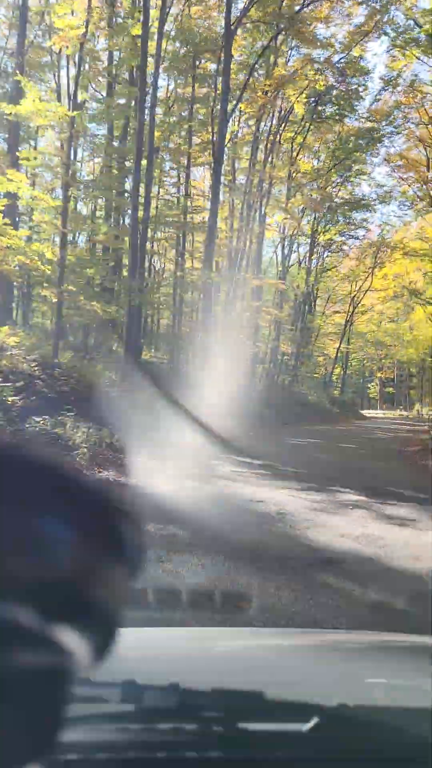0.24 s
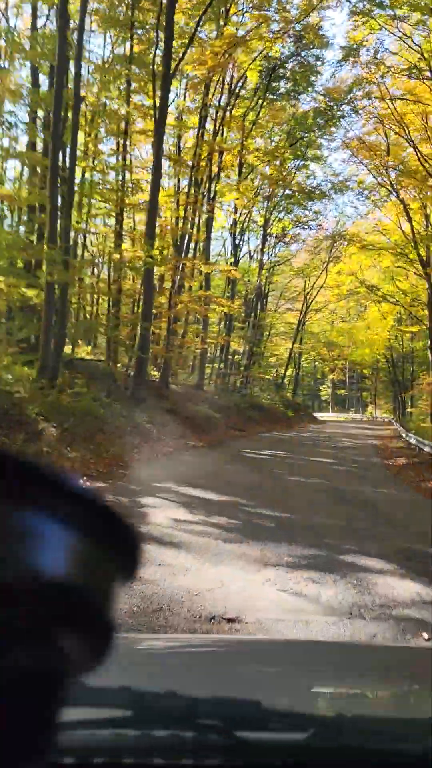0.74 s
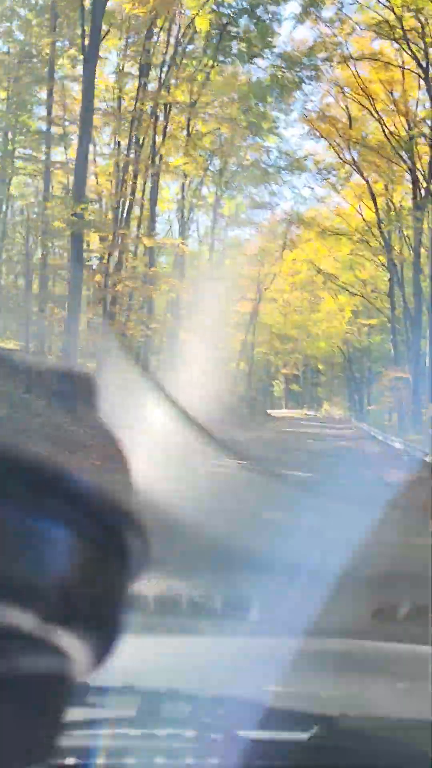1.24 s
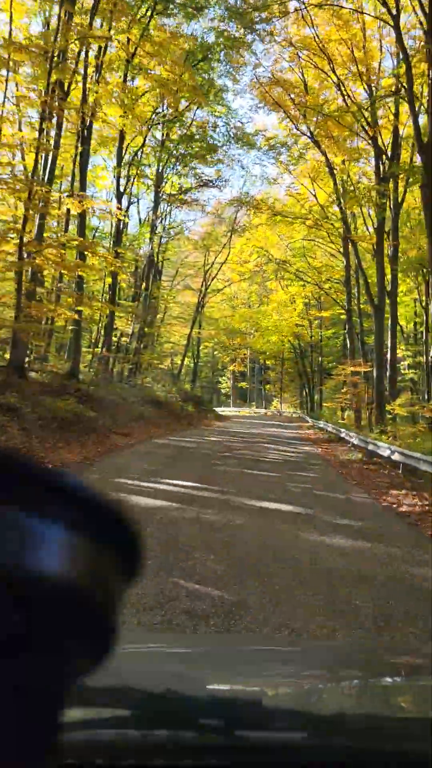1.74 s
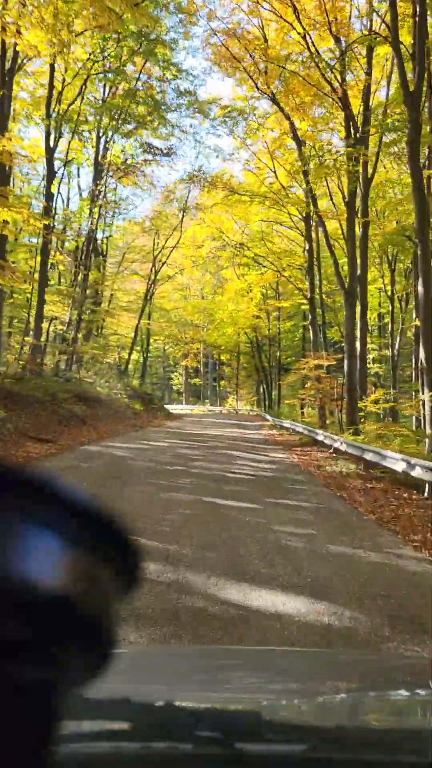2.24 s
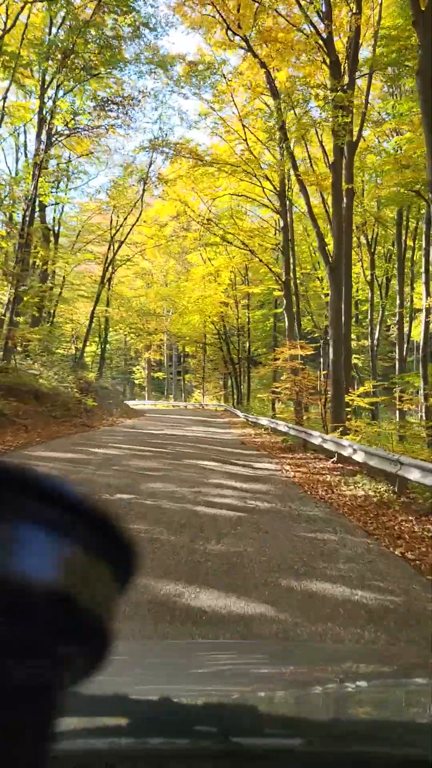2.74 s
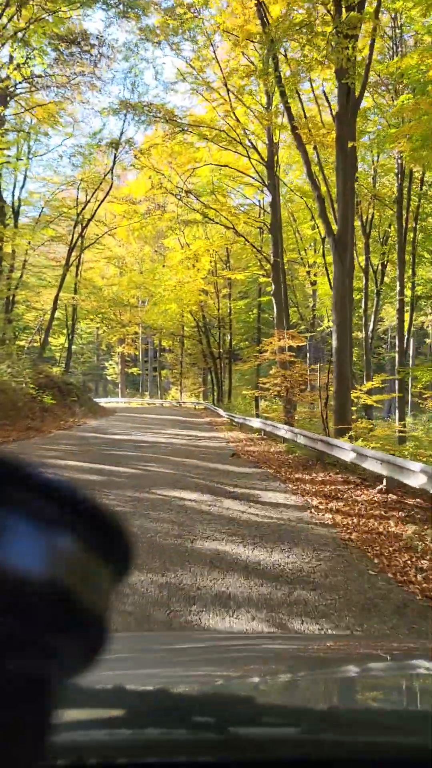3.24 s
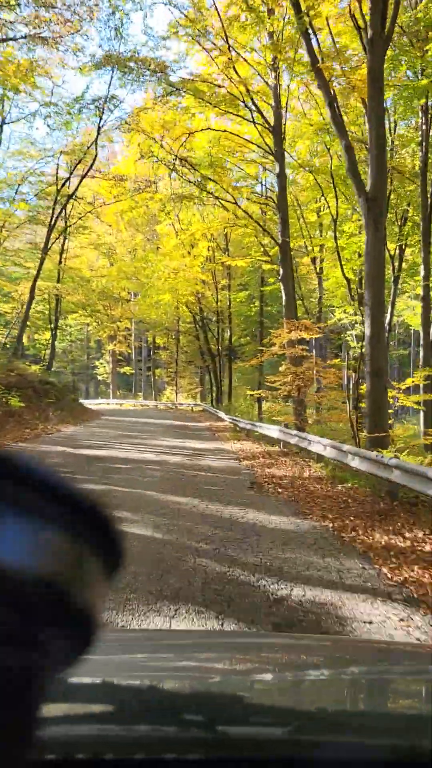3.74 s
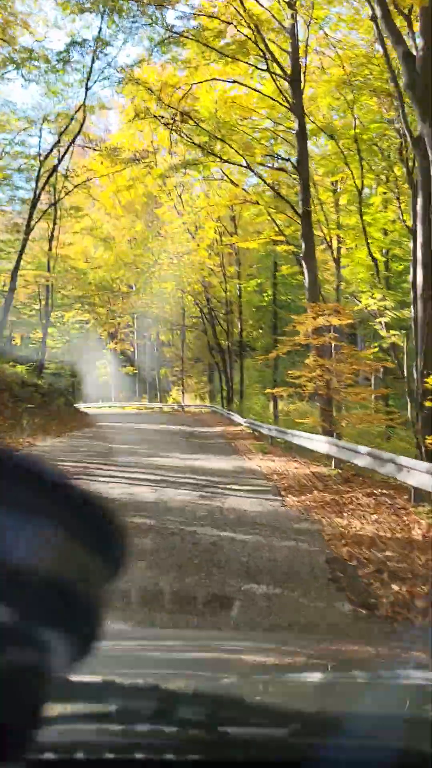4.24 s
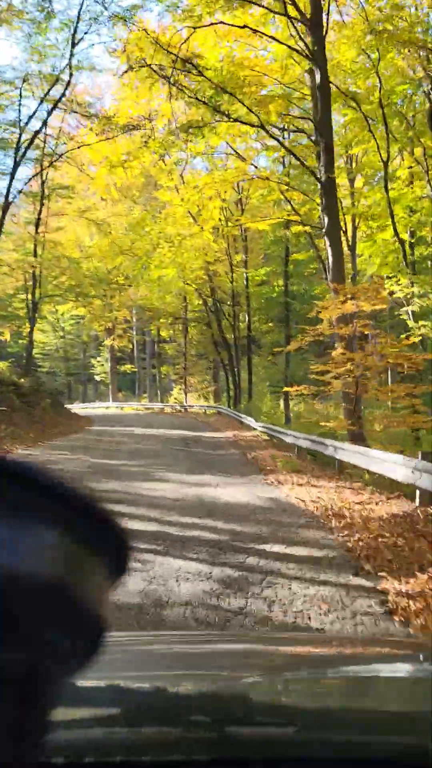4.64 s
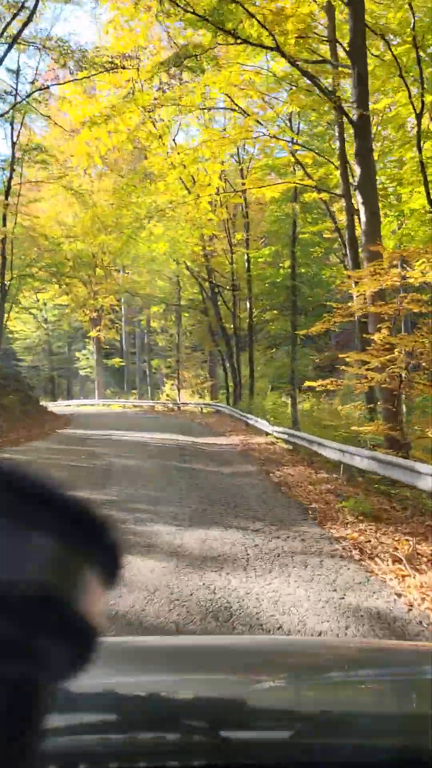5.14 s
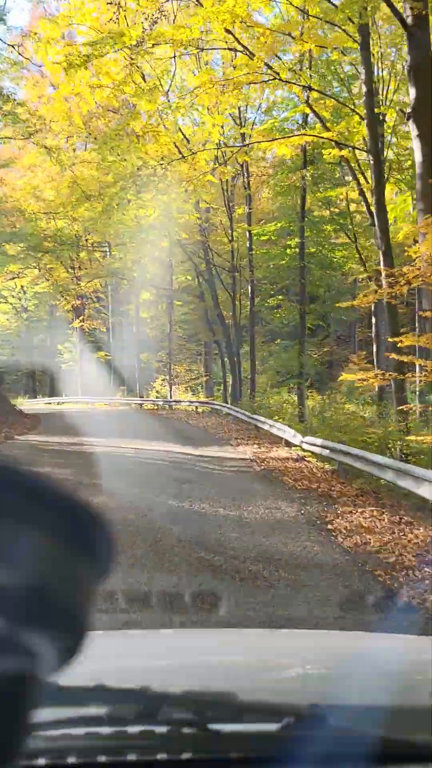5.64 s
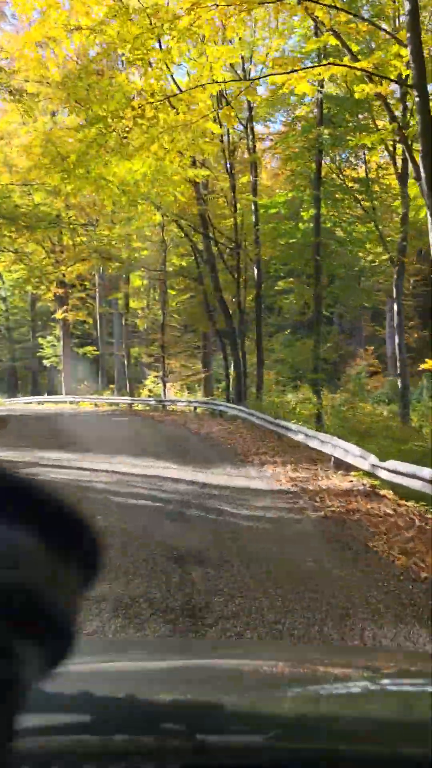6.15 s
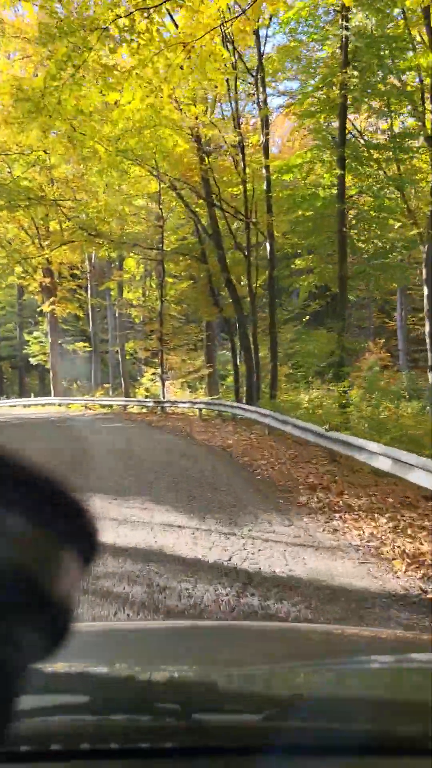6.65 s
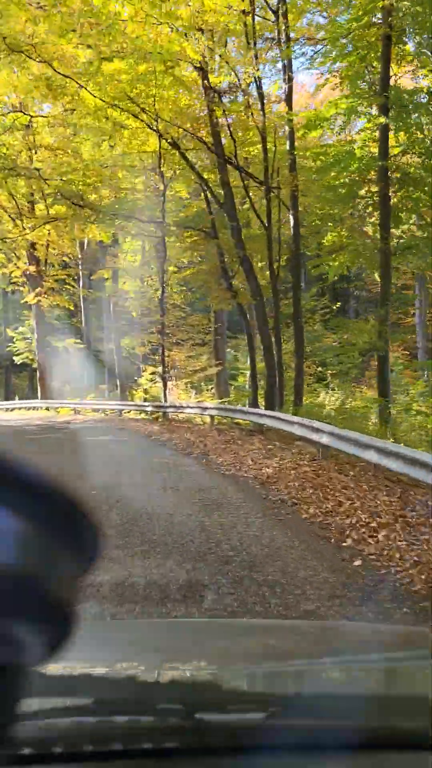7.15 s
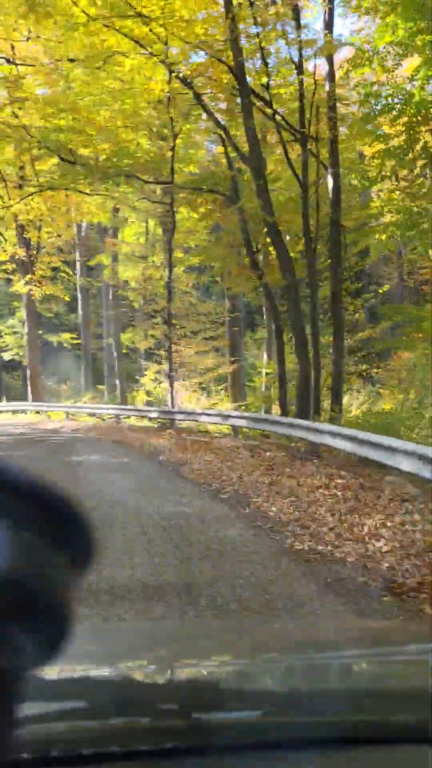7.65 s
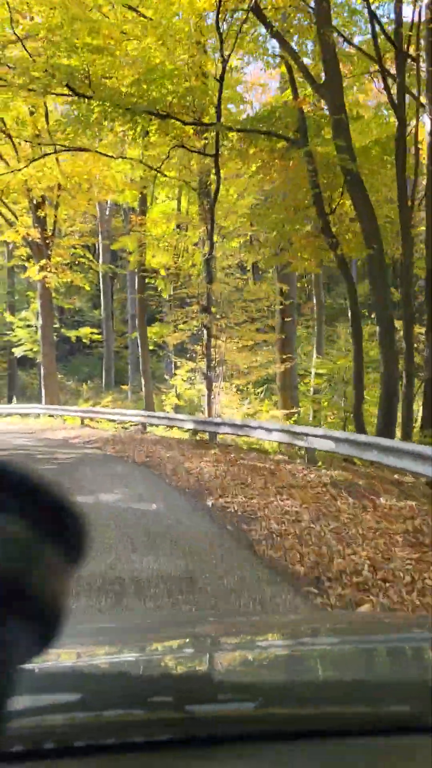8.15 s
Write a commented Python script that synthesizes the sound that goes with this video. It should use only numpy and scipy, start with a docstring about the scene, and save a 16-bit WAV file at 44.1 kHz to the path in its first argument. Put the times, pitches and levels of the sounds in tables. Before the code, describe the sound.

The enclosed cabin of a car driving on rough forest asphalt, heard in stereo near the windscreen. Throughout, a very deep body boom and low floor thrum waver and swell over bumps, beneath a muffled, uneven tyre hum and roar. A quiet fluttering trim hiss, tiny crackles and bright ticks of a loose plastic dash part sit on top, the ticks leaning slightly right. From 0 to 1.6 s the road is bumpy, with dry knocks clustered at 0.7-1.3 s, strongest near 0.95. From about 1.8 to 3.5 s it smooths and quietens, with only sparse ticks. Roughness returns at 3.6 s; the hardest jolt, a sharp crack with heavy boom, comes at 4.2 s, and a smaller one at 4.44. It calms from 4.7 to 5.8 s. Knocks near 6 s begin another rough stretch, with frequent rattling and lesser knocks at 7.3, 7.7 and 8 s, easing slightly by 8.4.

```python
"""Car cabin on a rough forest road

A two-port microphone behind the windscreen hears the body boom and the floor thrum at every bump,
above an uneven tyre hum and a roar that follows the road. Trim hisses and crackles, a loose plastic
part on the dash ticks, and harder bumps knock the trim. All sources are shaped noise: resonances or
drawn colours set the timbre, the unevenness and coarseness of the road drive the continuous layers,
and ticks, snaps and knocks are short puffs."""
import sys
import numpy as np
from scipy import signal
from scipy.fft import irfft
from scipy.io import wavfile
from scipy.ndimage import uniform_filter1d

SR = 44100
rng = np.random.default_rng(int(sys.argv[2]) if len(sys.argv) > 2 else 0)


def gain_from_decibels(decibels):
    """Convert decibel values to linear amplitude factors."""
    exponent = np.asarray(decibels, float) / 20
    return 10 ** exponent


def master(y):
    """Save y as 16-bit WAV."""
    cut = np.clip(np.atleast_2d(y).T, -1, 1)
    pcm = np.round(cut * 32767)  # scale
    wavfile.write(sys.argv[1], SR, pcm.astype(np.int16))


N = 370440

# a wheel meets a bump: crest_s, boom_db, thrum_db,
# grit_change_db (added to the coarseness: mostly a crunch, at a few bumps a slight lull)
BUMPS = [(0.09, -26, -23, 5), (0.36, -20.5, -22, 4.5), (0.479, -13, -19, 3.5), (0.61, -12.5, -19.5, -1.5),
         (0.739, -28.5, -21, 2.5), (0.92, -15, -18.5, 9.5), (0.979, -11.5, -23, -0.5),
         (1.131, -9.5, -20.5, 3.5), (1.2, -10.5, -17.5, 0.5), (1.57, -16, -21, 1.5), (3.699, -16, -23.5, 2),
         (3.79, -27, -16.5, -3.1), (3.909, -19.5, -19.5, 2), (4.19, -6, -10.5, 8.5),
         (4.24, -21.5, -24, 6.5), (4.36, -16, -21.5, 1.5), (4.449, -9, -13, 3.5), (4.5, -12.5, -33.5, 5),
         (4.721, -15, -30, 2.5), (5.26, -21.5, -32, 1.5), (5.39, -14, -32.5, 4), (6.0, -12, -25.5, 4),
         (6.17, -29, -24, 3.5), (6.258, -10.5, -21, 5), (6.7, -17.5, -23, 2.5), (7.1, -16.5, -18.5, 1.5),
         (7.259, -18, -21.5, 1), (7.528, -16, -21, 2), (7.68, -12.5, -17, 2.5), (8.04, -13.5, -15, 4),
         (8.16, -18, -17, 4.5)]


def evened(x):
    """Scales to rms 1."""
    return x / np.sqrt(np.mean(x ** 2) + 1e-20)


def read(points, hz):
    """Reads a table on a log-frequency axis."""
    f, value = np.transpose(points)
    return np.interp(np.log(hz + 1), np.log(f + 1), value)


def filled(coarse):
    """Spreads values given every 64 samples over all samples in straight lines."""
    return np.interp(np.arange(N), np.arange(0, N, 64), coarse)


def flutter(s):
    """Smooth chance of rms 1 that changes over about s seconds."""
    width = int(s * SR)
    return evened(uniform_filter1d(uniform_filter1d(rng.standard_normal(N), width), width))


def shaking(axis):
    """One column of the road in dB for every sample: 1 unevenness, 2 coarseness."""
    # the road under the wheels: time_s, unevenness_db, coarseness_db
    road = [(0.0, 2, -3.5), (0.3, 5.5, 0.5), (0.8, 2.5, 2), (1.2, 0.5, 3), (1.62, 3.5, 2.5), (1.8, 1, -4.5),
            (2.3, -1.5, -5.5), (2.95, -3, -3.5), (3.601, 5.5, 3.5), (4.05, 3, 2.5), (4.4, 3, 3.5),
            (4.721, -0.5, -5.5), (5.201, -0.5, -3.5), (5.621, 0, -5), (5.9, 4, 2.5), (6.501, 4.5, 0.5),
            (7.1, 4.5, 2.5), (7.6, 4.5, 4), (7.9, 2, 0.5), (8.4, 1, -2)]
    return np.interp(np.arange(N) / SR, [row[0] for row in road], [row[axis] for row in road])


def grit_db():
    """Coarseness of the asphalt, changed for a moment at a bump: mostly a crunch, at a few a lull."""
    change_s = 0.044
    t = np.arange(0, N, 64) / SR
    change_db = sum(db * np.exp(-((t - s) / change_s) ** 2) for s, _, _, db in BUMPS)
    return shaking(axis=2) + filled(change_db)


def jolted(steady_db, axis):
    """Gain with the swell of every bump added in power: a quick climb to the crest, a slower fall."""
    rise_db_per_s, fall_db_per_s = 260.5, 199
    t = np.arange(0, N, 64) / SR
    power = 0
    for row in BUMPS:
        late = t - row[0]
        below_crest_db = np.maximum(-rise_db_per_s * late, fall_db_per_s * late)
        power = power + gain_from_decibels(row[axis] - below_crest_db) ** 2
    return np.sqrt(gain_from_decibels(steady_db) ** 2 + filled(power))


def modes_db(modes, hz, order=1):
    """Summed power of resonances as dB over frequency; a higher order steepens their skirts."""
    power = sum(gain_from_decibels(db) ** 2 / (1 + (2 * (hz - f) / w) ** 2) ** order for f, w, db in modes)
    return 10 * np.log10(power)


def ports(colour_db, size=N):
    """Coloured noise of rms 1 at both ports: partly alike, the left phase-shifted and rebalanced."""
    # likeness of the ports: pitch_hz, likeness (0 to 1)
    likeness = [(50, 0.99), (130, 0.97), (290, 0.87), (640, 0.89), (1400, 0.3), (4000, 0.57), (8000, 0.92),
                (15000, 0.59)]
    # stereo balance: pitch_hz, left_minus_right_db
    balance = [(40, 0.6), (150, 2), (280, -1), (600, 2), (1200, 1), (2500, 1.2), (5500, -1), (9000, 7),
               (14000, 1.5)]
    # phase by which the left port leads, negative when late: pitch_hz, lead_rad
    phase_lead = [(50, 0.04), (300, 0.03), (550, -0.6), (800, -1.4), (1120, -3.0), (1800, -4), (2500, -4.5),
                  (5000, -5), (15000, -4.5)]
    hz = np.fft.rfftfreq(size, 1 / SR)
    a, b, c, d = rng.standard_normal((len(hz), 4)).T
    same = np.clip(read(likeness, hz), 0, 1)
    right = a + 1j * b
    shared = same * right * np.exp(1j * read(phase_lead, hz))
    left = shared + np.sqrt(1 - same ** 2) * (c + 1j * d)
    tilt = gain_from_decibels(read(balance, hz) / 2)
    return evened(irfft(np.array([left * tilt, right / tilt]) * gain_from_decibels(colour_db(hz)), size))


def steadied(x, s, share):
    """Takes part of the noise's own swell away, so that the road sets the level."""
    width = int(s * SR)
    swell = uniform_filter1d(uniform_filter1d((x ** 2).mean(0), width), width)
    return evened(x / (swell + 1e-3) ** (np.clip(share, 0, 1) / 2))


def add(mix, s, db, t60, colour_db, rise_s):
    """Adds a puff of coloured noise with a quick rise and a dying tail."""
    t = np.arange(4096) / SR
    envelope = gain_from_decibels(db - 60 * t / t60) * np.minimum(t / rise_s, 1)
    puff = envelope * ports(colour_db, size=4096)
    part = mix[:, round(s * SR):][:, :4096]
    part += puff[:, :part.shape[1]]


def boom():
    """Air and shell of the cabin ring as one low resonance, swelling under every bump."""
    pitch_hz, width_hz, base_db = 51.06, 16, -23
    noise = ports(lambda hz: modes_db([(pitch_hz, width_hz, 0)], hz, order=2))
    return steadied(noise, 0.049, 0.73) * jolted(base_db + shaking(axis=1), axis=1)


def thrum():
    """Floor panels, shaken by the suspension, ring in a few low resonances."""
    # floor panels: pitch_hz, width_hz (6 dB down), level_db (relative)
    floor_modes = [(74.7, 14, 3), (91.46, 5.4, 0.5), (106.2, 21, -3.5), (130.4, 21, -7)]
    base_db, db_per_uneven_db, db_per_coarse_db = -24, 0.63, 0.27
    steady_db = base_db + db_per_uneven_db * shaking(axis=1) + db_per_coarse_db * shaking(axis=2)
    noise = ports(lambda hz: modes_db(floor_modes, hz, order=2))
    return steadied(noise, 0.053, 0.59) * jolted(steady_db, axis=2)


def roar():
    """Tread on coarse asphalt roars and rings the dash panels; air in the tyres hums unevenly."""
    # colour of the roar: pitch_hz, density_db (relative, per Hz)
    roar_colour = [(88, -27), (150, -6), (183, -9), (254, -8.5), (392, -21.5), (612, -27.5), (676, -30.5),
                   (824, -29.5), (1140, -35.5), (1600, -43.5), (2080, -71.5), (3520, -120)]
    # air ring inside the tyres: pitch_hz, width_hz (6 dB down), level_db (against the roar)
    tyre_air = (252, 11, -9)
    # dash panels: pitch_hz, width_hz (6 dB down), level_db (relative)
    dash_modes = [(332.7, 27, 2), (428, 19, -6.5), (609, 41, -3.5), (767, 110, -4)]
    # how freely the dash rings: time_s, level_db (against the roar, before a 4 dB cut)
    dash_freedom = [(0, -13.5), (1.5, -19), (5.8, -16.5), (8.4, -12)]
    base_db, db_per_coarse_db = -36.5, 0.78
    hum = ports(lambda hz: modes_db([tyre_air], hz, order=2))
    hum = hum * gain_from_decibels(tyre_air[2] + 3.7 * flutter(0.25))
    panels = 0
    for mode in dash_modes:  # each panel swells in its own time
        ring = ports(lambda hz: modes_db([mode], hz, order=2))
        panels = panels + ring * gain_from_decibels(mode[2] + 2.5 * flutter(0.08))
    dash_db = np.interp(np.arange(N) / SR, *np.transpose(dash_freedom)) - 4.0
    tread = ports(lambda hz: read(roar_colour, hz))
    return (tread + hum + panels * gain_from_decibels(dash_db)) * gain_from_decibels(base_db + db_per_coarse_db * grit_db())


def contact_db():
    """Reference level of the small trim contacts, which grows faster than the coarseness."""
    return -62 + 1.22 * grit_db()


def buzz():
    """Countless small trim contacts: a fluttering hiss whose top opens further on rough stretches."""
    # colour of the hiss: pitch_hz, density_db (relative, per Hz, before the top opens)
    hiss_colour = [(530, -30.5), (900, -3.5), (1140, -11), (1740, -12), (1890, -10.5), (2400, -17.5),
                   (3640, -21.5), (4210, -27.5), (5740, -30), (8020, -44), (15700, -44)]
    level_db = contact_db()
    hiss = ports(lambda hz: read(hiss_colour, hz))
    top = signal.sosfilt(signal.butter(2, 5000, "high", fs=SR, output="sos"), hiss)
    opening = np.clip(gain_from_decibels(0.26 * (level_db + 59.0)), 0, 2)
    flutter_db = 1.8 * flutter(0.0061) + 1.4 * flutter(0.017)
    return (hiss + (opening - 1) * top) * gain_from_decibels(level_db + flutter_db + 5.0)


def crackle():
    """Sparse tiny trim snaps, each ringing at its own pitch, louder on rough stretches."""
    level_db = contact_db()
    out = np.zeros((2, N))
    for place, pitch, size in rng.random((500, 3)):
        mode = (1200 * 3.2 ** pitch, 900, 0)  # pitch Hz, width Hz, dB
        # higher snaps are weaker, and a few stand far out
        db = level_db[int(place * N)] - 3.5 - 6.0 * pitch - 2.7 * np.log(size + .05)
        add(out, place * N / SR, db, .035, lambda hz: modes_db([mode], hz, order=2), .001)
    return out


def rattle(body):
    """The loose part rings at each tick and rebounds with the dash; faint ticks ride boom crests."""
    # clearest ticks of the loose part: start_s, level_db (before port balance), rebound_loss_db
    clear_ticks = [(0.0877, -56.5, 3), (0.154, -57.5, 11), (0.3407, -51.5, 3), (0.5652, -55.5, 8),
                   (0.646, -58, 1.5), (0.6944, -56, 3), (0.7202, -45, 5), (0.8086, -49.5, 6),
                   (0.866, -50, 6), (0.899, -52, 6), (0.9261, -47.5, 2), (0.9992, -50.5, 5),
                   (1.063, -46.5, 7.5), (1.1347, -49.5, 4), (1.192, -56, 2), (1.3145, -54, 2),
                   (1.5514, -53.5, 3.5), (1.7012, -53, 8), (1.8065, -59, 3.5), (1.8677, -57, 6),
                   (2.283, -56, 4.5), (2.5571, -61, 2), (2.981, -55.5, 6), (3.057, -58, 5),
                   (3.26, -58, 14.5), (3.5471, -60, 9), (3.64, -52.5, 2), (3.8232, -59.5, 8.5),
                   (3.9051, -54, 7), (4.031, -53, 5.5), (4.141, -54, 8), (4.18, -51, 7),
                   (4.2213, -41.5, 8.5), (4.4384, -57.5, 4), (4.6065, -58.5, 3.5), (4.712, -59, 7),
                   (5.051, -59.5, 1), (5.1857, -62.5, 7.5), (5.271, -60, 6), (5.312, -60, 5.5),
                   (5.461, -56.5, 9), (5.844, -52.5, 1), (5.967, -51.5, 3), (5.9885, -47.5, 4.5),
                   (6.0917, -48, 3.5), (6.2265, -51.5, 2.5), (6.311, -54.5, 9), (6.3765, -54, 6.5),
                   (6.4938, -54.5, 5), (6.5546, -52, 0.5), (6.6996, -48, 5), (6.7592, -52, 1.5),
                   (6.9516, -51, 2.5), (7.1067, -50, 6), (7.234, -58, 3), (7.257, -45.5, 5),
                   (7.3675, -50.5, 2.5), (7.476, -55, -1.5), (7.547, -49, 6), (7.5943, -47.5, 2),
                   (7.674, -53, -1), (7.7218, -52, 0), (7.7859, -49.5, 4), (7.848, -49.5, 8),
                   (7.916, -56.5, 13), (7.9742, -51.5, 3), (7.9952, -48, 6), (8.118, -60, 3),
                   (8.1412, -51.5, -0.5), (8.1906, -54, 3.5)]
    # resonances of the loose part: pitch_hz, width_hz (6 dB down), level_db (for a hard tick)
    part_modes = [(2050, 910, -4), (4530, 720, -9), (5250, 500, -8.5), (5760, 900, -6), (6870, 1200, -12.5),
                  (11700, 1400, -19)]
    sway_s = 0.024  # one sway of the dash
    out = np.zeros((2, N))
    crests = signal.find_peaks(body[1], distance=SR // 70)[0]
    faint_db = -69.0 + 1.8 * shaking(axis=2)[crests] + 4.0 * rng.standard_normal(N)[crests]
    ticks = [row[:2] for row in clear_ticks] + list(zip(crests / SR, faint_db))
    next_starts = [row[0] for row in clear_ticks[1:]] + [N / SR]
    chances = rng.standard_normal((len(clear_ticks), 3, 2))
    for (s, db, loss_db), next_s, chance in zip(clear_ticks, next_starts, chances):
        for k, (late, loss) in enumerate(chance, 1):
            at = s + k * sway_s + 0.0017 * late
            if at < next_s - sway_s / 2:  # the next clear tick cuts the rebounds short
                ticks.append((at, db - loss_db * k + 2.0 * loss))
    own_db = 3.0 * rng.standard_normal((len(ticks), len(part_modes)))  # no two land alike
    for (s, db), shares in zip(ticks, own_db):
        softness = np.clip(-(db + 44.5) * 0.29, 0, 8)  # a soft tick rings the weaker modes less
        modes = [(f, w, m * (1 + softness / 8) + own) for (f, w, m), own in zip(part_modes, shares)]
        add(out, s, db, .055, lambda hz: modes_db(modes, hz, order=2), .001)
    return out * gain_from_decibels([[-1.5], [1.5]])  # leans to the right port


def knocks():
    """Trim cracks when a wheel hits a ridge: a short dry scatter of noise with a bright snap."""
    # knocks of the trim: start_s, level_db (of the scatter at its onset)
    hits = [(0.7194, -40), (0.869, -39), (0.9274, -43.5), (0.9377, -32), (0.9647, -29.5), (1.063, -37.5),
            (1.129, -41), (1.2677, -39.5), (3.6755, -47), (3.9078, -42.5), (4.1877, -33.5), (4.21, -27),
            (4.2224, -22), (4.2356, -32), (4.424, -42), (4.4409, -33), (5.3735, -47), (5.968, -35.5),
            (5.9981, -37), (7.2588, -39.5), (7.5334, -44), (7.6696, -36), (7.997, -37.5)]
    # colour of the trim: pitch_hz, density_db (relative, per Hz)
    trim_colour = [(180, -46.5), (300, -4), (411, -5), (972, -7), (1190, -11.5), (2050, -19.5), (2340, -23),
                   (2760, -17), (3310, -23), (15700, -52)]
    scatter_t60_s, snap_t60_s, snap_db = .08, 0.0095, -1.5

    def bright(hz):
        return read(trim_colour, hz) + 0.86 * np.log2(hz / 2000 + .05)

    out = np.zeros((2, N))
    for s, db in hits:
        add(out, s + 0.0013, db + snap_db, snap_t60_s, bright, .0005)
        add(out, s, db, scatter_t60_s, lambda hz: read(trim_colour, hz), .004)
    return out


def scene():
    """All sources at the two ports; the boom also sets off the faint ticks."""
    body = boom()
    return body + thrum() + roar() + buzz() + crackle() + rattle(body) + knocks()


def top_cut(x):
    """Nothing passes above the cut-off."""
    return signal.sosfilt(signal.butter(12, 15820, fs=SR, output="sos"), x)


def record(dry):
    """The input stage rounds off the highest crests."""
    mix = 1.187 * np.tanh(dry / 1.026)
    return top_cut(mix)


dry = scene()
out = record(dry)
master(out)
```